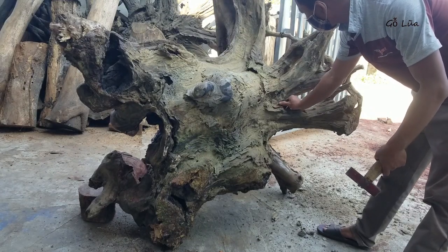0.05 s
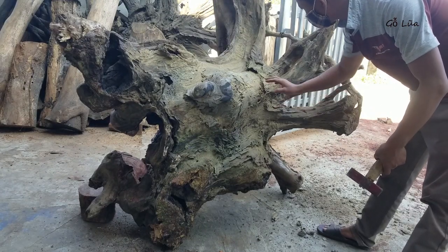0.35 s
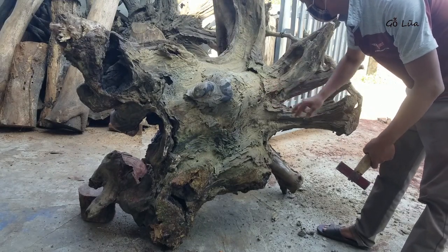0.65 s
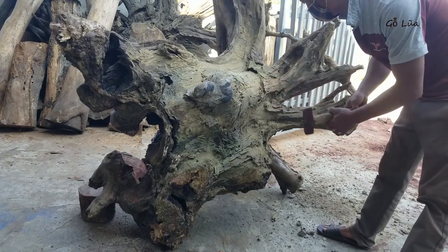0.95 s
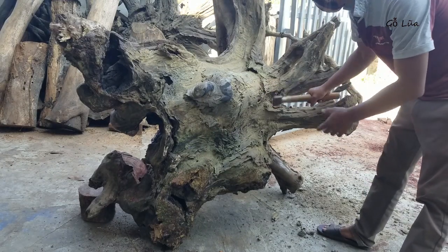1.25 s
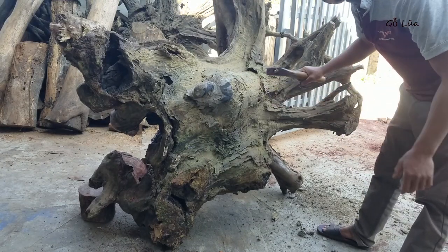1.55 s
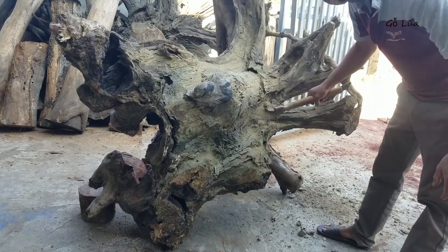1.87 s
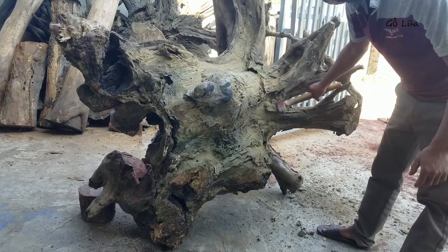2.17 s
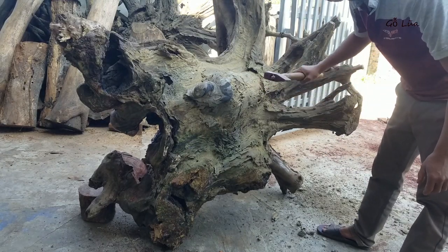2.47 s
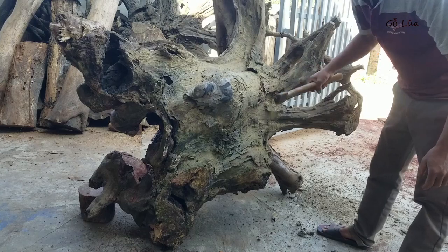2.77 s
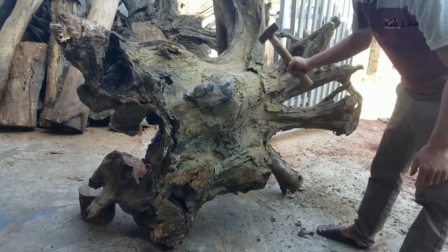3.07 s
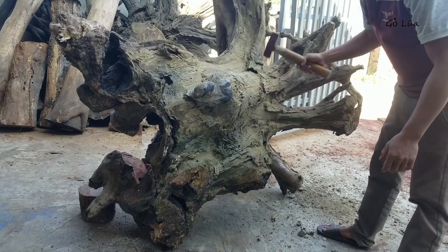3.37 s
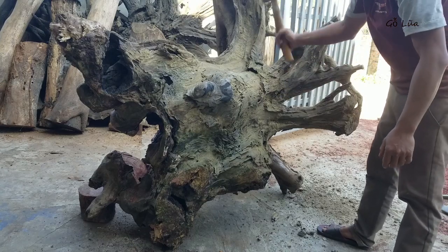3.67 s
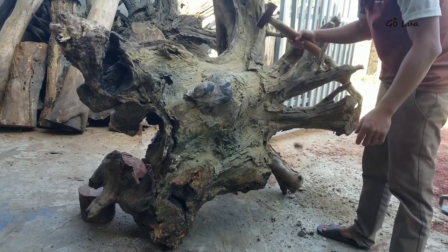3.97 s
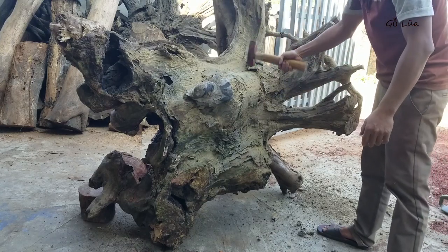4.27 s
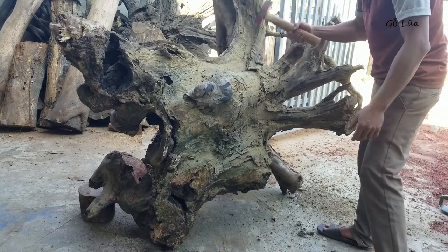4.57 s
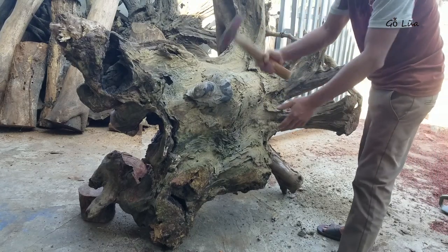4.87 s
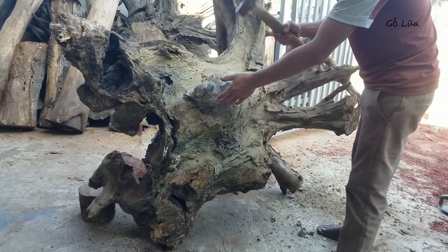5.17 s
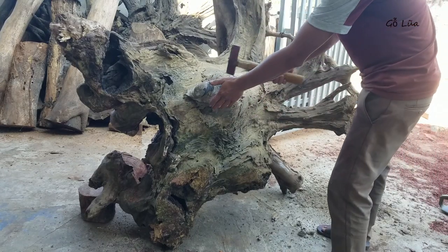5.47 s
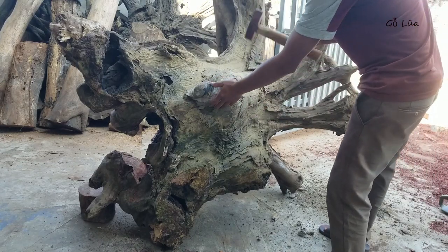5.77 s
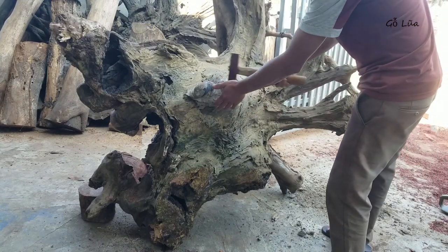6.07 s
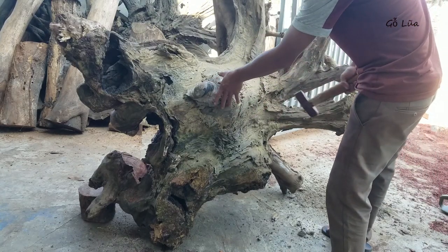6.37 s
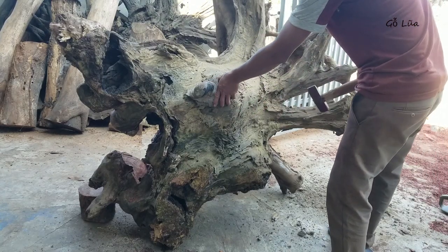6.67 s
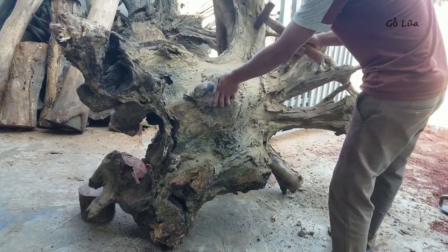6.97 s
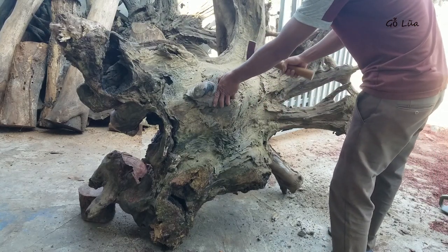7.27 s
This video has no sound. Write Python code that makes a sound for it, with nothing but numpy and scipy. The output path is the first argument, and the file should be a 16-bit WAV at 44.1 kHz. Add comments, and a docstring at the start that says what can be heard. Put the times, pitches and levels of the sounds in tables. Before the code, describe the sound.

An open workshop has a faint low murmur, and soft puffs of air bump the left microphone at about 0.5 and 1.1 seconds. At 1.3 seconds a steel hammer starts striking a large dry wooden stump, roughly twice a second. There are eleven close blows, stronger on the left, each a short woody clatter with a slight ring and a brief echo. They vary from hollow thuds to dry cracks, some with a small extra clack or a faint steel ring. The sharpest cracks fall at 3.8, 5.5 and 6.1 seconds, with a solid knock at 5 seconds. A hand brushes the wood very softly near 5.8 seconds. After a longer gap, the last blow lands at 7.3 seconds. Far behind, a grinder hisses and whines faintly, its pitch sagging and recovering, along with a few barely audible whistling tones.

```python
"""Hammer on a dry stump

In an open workshop a steel hammer knocks eleven times on different limbs of a big dry stump.
Each blow is a short woody clatter, a few ringing modes of the stump and the wash of the hall.
Far off a grinder hisses and whines under changing load. A draught bumps the left microphone
before the first blow, and once a steadying hand brushes the wood."""
import sys
import numpy as np
from scipy import signal
from scipy.fft import rfft, irfft
from scipy.io import wavfile
from scipy.ndimage import uniform_filter1d

SR = 44100
rng = np.random.default_rng(int(sys.argv[2]) if len(sys.argv) > 2 else 0)


def master(y):
    """Save y as 16-bit WAV."""
    cut = np.clip(np.atleast_2d(y).T, -1, 1)
    pcm = np.round(cut * 32767)  # scale
    wavfile.write(sys.argv[1], SR, pcm.astype(np.int16))


N = 332073
SIZE = 32768  # samples in one blow with its tail
T, HZ = np.arange(SIZE) / SR, np.fft.rfftfreq(SIZE, 1 / SR)
SCENE_T, SCENE_HZ = np.arange(N) / SR, np.fft.rfftfreq(N, 1 / SR)


def amp(db):
    """Decibels to gain."""
    return 10 ** (np.asarray(db) / 20)


def unit(x):
    """Scales to rms 1."""
    return x / np.sqrt(np.mean(x ** 2) + 1e-20)


def read(points, hz):
    """Reads a spectrum on a log-frequency axis."""
    f, value = np.transpose(points)
    return np.interp(np.log(hz + 1), np.log(f + 1), value)


def curve(points):
    """Reads a time curve at every sample."""
    return np.interp(SCENE_T, *np.transpose(points))


def add(mix, start_s, sound):
    """Mixes a sound in at start_s."""
    part = mix[..., max(round(start_s * SR), 0):][..., :sound.shape[-1]]
    part += sound[..., :part.shape[-1]]


def causal(db):
    """Minimum-phase response with the given gain: nothing sounds before the blow."""
    cepstrum = irfft(np.log(amp(db)))
    cepstrum[1:SIZE // 2] *= 2
    cepstrum[SIZE // 2 + 1:] = 0
    return np.exp(rfft(cepstrum))


def flattener(spectrum):
    """Filter that evens a spectrum out over half octaves, keeping its fine peaks."""
    bins, energy = np.arange(len(HZ)), np.cumsum(abs(spectrum) ** 2)
    low, high = np.maximum(bins * 5 // 6 - 40, 0), np.minimum(bins * 6 // 5 + 40, bins[-1])
    return causal(-10 * np.log10((energy[high] - energy[low]) / (high - low) + 1e-12))


def waveform(spectrum):
    """Spectrum to waveform, faded out at its far end."""
    return irfft(spectrum) * np.clip(5 - 6 * T / T[-1], 0, 1)


def noise_pair(size, coherence):
    """Spectra of white noise at the two microphones, alike to the given degree."""
    left, other = rfft(rng.standard_normal((2, size)))
    coherence = np.clip(coherence, -1, 1)
    return np.array([left, coherence * left + np.sqrt(1 - coherence ** 2) * other])


# Diffuse sound of the hall across the microphone pair: frequency_hz, coherence
DIFFUSE_FIELD = [(60, 0.84), (250, 0.69), (600, 0.37), (1400, -0.23), (3000, -0.13), (15000, 0.22)]
def diffuse(hz):
    """Sound from all sides reaches both microphones alike only in the bass."""
    return read(DIFFUSE_FIELD, hz)


# The far grinder's disc pressed into the work: start_s, length_s, loaded_pitch_hz, whine_gain_db
DISC_BITES = [(1.423, 1.38, 4830, -7), (2.92, 0.5, 4400, -2), (3.52, 0.85, 4750, -3),
              (4.46, 0.79, 4270, -3.5), (5.45, 0.74, 3700, -7), (6.55, 0.63, 3600, 1), (7.3, 0.2, 4400, 1)]
def disc(start_hz=5800, free_hz=7520, free_db=-9.5, sag_s=0.28, recover_s=0.58, swell_s=0.3):
    """Pitch and gain of the whine: the disc slows under each bite and spins up when lifted."""
    pitch = free_hz + (start_hz - free_hz) * np.exp(-SCENE_T / recover_s)
    db = np.full(N, free_db)
    for start_s, length_s, loaded_hz, loaded_db in DISC_BITES:
        press = (start_s, loaded_hz, loaded_db, sag_s)
        lift = (start_s + length_s, free_hz, free_db, recover_s)
        for at_s, goal_hz, goal_db, lag_s in press, lift:
            i = min(round(at_s * SR), N - 1)
            pitch[i:] = goal_hz + (pitch[i] - goal_hz) * np.exp(-SCENE_T[:N - i] / lag_s)
            db[i:] = goal_db + (db[i] - goal_db) * np.exp(-SCENE_T[:N - i] / swell_s)
    return pitch, db


# Grinding hiss from across the workshop: frequency_hz, relative_db
HISS_SPECTRUM = [(120, -18), (200, -0.5), (290, -6), (750, -6), (1500, -7), (2600, -3), (3450, -1.5),
                 (4200, -5), (5100, -3.5), (6000, -8.5), (7500, -5.5), (8600, -18.5), (12400, -17.5),
                 (16000, -27)]
# Rise and fall of hiss and whine together at the microphones: time_s, gain_db
GRINDER_GAIN = [(0.0, -55), (0.29, -56), (1.66, -52.5), (1.86, -49.5), (2.41, -55.5), (2.75, -53.5),
                (3.14, -51.5), (3.36, -54), (3.88, -52.5), (4.03, -59), (4.91, -59), (5.56, -53),
                (5.87, -60.5), (6.52, -61.5), (6.73, -59.5), (7.3, -65), (7.45, -54.5), (7.53, -53.5)]
def grinder(hiss_db=7.5, whine_db=4.5, whine_width_hz=450, flutter_db=2, flutter_s=0.05):
    """A disc grinder, far off: broad hiss with a fuzzy, fluttering whine on top."""
    hiss_spectrum = noise_pair(N, diffuse(SCENE_HZ)) * amp(read(HISS_SPECTRUM, SCENE_HZ))
    hiss = amp(hiss_db) * unit(irfft(hiss_spectrum, N))
    pitch_hz, load_db = disc()
    flutter = amp(flutter_db * unit(uniform_filter1d(rng.standard_normal(N), round(flutter_s * SR))))
    tone = resonate(rng.standard_normal((2, N)), pitch_hz, whine_width_hz)
    whine = amp(whine_db + load_db) * unit(flutter * tone)
    return (hiss + whine) * amp(curve(GRINDER_GAIN))


def resonate(x, pitch_hz, width_hz):
    """A resonance that follows a steady or gliding pitch."""
    turn = np.exp(2j * np.pi * np.cumsum(pitch_hz * np.ones(x.shape[-1])) / SR)
    pole = np.exp(-np.pi * width_hz / SR)
    return (turn * signal.lfilter([(1 - pole) ** 2], [1, -2 * pole, pole ** 2], x / turn)).real


# Room tone all around the microphones: frequency_hz, relative_db
RUMBLE_SPECTRUM = [(20, -3), (60, -4), (120, 2), (250, -27.5), (600, -19.5), (3000, -74.5)]
# Its slow drift: time_s, level_db
RUMBLE_LEVEL = [(0, -55.5), (.5, -54.5), (.65, -49), (1.25, -55), (1.6, -55.5), (3.5, -56.5), (4.2, -59),
                (7.53, -66)]
def rumble(coherence=0.74):
    """Low murmur of the open hall."""
    spectrum = noise_pair(N, coherence) * amp(read(RUMBLE_SPECTRUM, SCENE_HZ))
    return amp(curve(RUMBLE_LEVEL)) * unit(irfft(spectrum, N))


# Faint tones in the distance: start_s, length_s, pitch_hz, level_db
FAR_WHISTLES = [(0.327, 0.31, 980, -57), (1.068, 0.32, 1257, -52), (2.712, 0.175, 1270, -53),
                (4.48, 0.387, 1270, -60.5), (7.034, .28, 1304, -60)]
def whistles(width_hz=120):
    """Now and then a faint, far-off whistle: a narrow band of noise fades in and out."""
    out = np.zeros((2, N))
    for start_s, length_s, pitch_hz, level_db in FAR_WHISTLES:
        tone = resonate(rng.standard_normal((2, SIZE)), pitch_hz, width_hz)[:, :round(length_s * SR)]
        add(out, start_s, amp(level_db) * unit(tone) * signal.windows.tukey(tone.shape[1], 0.5))
    return out


# Puffs of air right on the left microphone: start_s, length_s, level_db
DRAUGHT_PUFFS = [(0.517, 0.038, -35.5), (0.539, 0.041, -27.5), (0.572, 0.067, -41), (0.937, .08, -49.5),
                 (1.128, 0.11, -41.5)]
def draught(band_hz=(45, 150)):
    """Moving air bumps the left microphone, soft and low."""
    out = np.zeros((2, N))
    band = signal.butter(3, band_hz, "band", fs=SR, output="sos")
    for start_s, length_s, level_db in DRAUGHT_PUFFS:
        air = signal.sosfilt(band, rng.standard_normal(SIZE))[-round(length_s * SR):]
        add(out[0], start_s, amp(level_db) * unit(air * np.hanning(len(air))))
    return out


def mode_swarm(decays, coherence, rise_s):
    """Spectra of a dense swarm of modes, each band dying at its own speed."""
    noise, swarm = noise_pair(SIZE, coherence), 0
    centres_hz, t60s = np.transpose(decays)
    for t60_s, share in zip(t60s, np.eye(len(centres_hz))):
        band = irfft(noise * read(np.c_[centres_hz, share], HZ))
        swarm = swarm + band * amp(-60 * T / t60_s) / np.sqrt(t60_s)
    spectra = rfft(swarm * (1 - np.exp(-T / rise_s)))
    return spectra * flattener(spectra[0])


# Dense clatter at the stump itself: frequency_hz, t60_s
CLATTER_DECAY = [(100, 0.07), (500, 0.05), (1200, 0.047), (3000, 0.035), (10000, 0.03)]
# Bounces off the floor and stacked timber nearby: delay_s, gain
NEAR_ECHOES = [(.0027, 0.22), (.0052, 0.083), (0.018, .22)]
# Wash coming back from the hall: frequency_hz, t60_s
HALL_DECAY = [(100, 0.53), (400, 0.53), (1000, 0.59), (2500, 0.51), (6000, 0.43), (14000, 0.28)]
# That wash against the near sound: frequency_hz, relative_db
HALL_BALANCE = [(100, 7.5), (500, 0.5), (1500, -2.5), (4000, -3), (12000, -2.5)]
def impact(hall_db, contact_gain, contact_s=0.00028, hall_delay_s=0.0065, imprint=0.41):
    """Steel meets wood: spectra of a sharp contact, clattering roots, near echoes and the hall."""
    snap = rfft(rng.standard_normal(SIZE) * (T / contact_s) * np.exp(-T / contact_s))
    snap = snap * flattener(snap) * HZ / (HZ + 500)  # the small contact spot radiates little bass
    coherence = read([(200, 1.0), (1000, 0.8), (8000, 0.63)], HZ)
    clatter = mode_swarm(CLATTER_DECAY, coherence, rise_s=0.0008)
    echoes = sum(gain * np.exp(-2j * np.pi * HZ * delay_s) for delay_s, gain in NEAR_ECHOES)
    near = (contact_gain * snap + clatter) * (1 + echoes)
    hall = mode_swarm(HALL_DECAY, diffuse(HZ), rise_s=0.0075) * np.exp(-2j * np.pi * HZ * hall_delay_s)
    hall *= causal(imprint * 20 * np.log10(abs(clatter[0]) + 0.086))  # it holds the clatter's peaks
    wet = amp(hall_db + read(HALL_BALANCE, HZ))
    return (near * flattener(near[0]) + wet * hall * flattener(hall[0])) / np.sqrt(1 + wet ** 2)


# An average blow as it reaches the left microphone: frequency_hz, gain_db
WOOD_SPECTRUM = [(30, 8.5), (60, 23), (110, 20.5), (200, 25), (380, 26.5), (620, 26.5), (1000, 18),
                 (1600, 14.5), (2500, 14.5), (3700, 7.5), (5000, 7.5), (7500, 0.5), (8700, -4), (15000, -5)]
def wood_colour(shape_db, note_hz, boost_db, q):
    """Response of the struck wood, reshaped by shape_db, with one narrow local resonance."""
    note_power = 1 + (amp(boost_db) ** 2 - 1) / (1 + (2 * q * (HZ / note_hz - 1)) ** 2)
    return causal(read(WOOD_SPECTRUM, HZ) + shape_db + 10 * np.log10(note_power))


# Light contacts on the stump: start_s, gain_db, tilt_db_per_octave, clack_boost_db
HAMMER_TOUCHES = [(1.3185, -5, -1.5, 3.5), (2.665, -17.5, 1.5, 5), (4.248, -40, 9, 3),
                  (4.775, -39.5, 5.5, 1), (4.9564, -8, 1, 18.5)]
def hammer_touches(clack_hz=3000):
    """The hammer head touches the wood with a small clack, just ahead of a blow or between blows."""
    out = np.zeros((2, N))
    tap = impact(hall_db=-9, contact_gain=1.3)
    octaves = np.log2(HZ / 1000 + 0.1)
    for start_s, gain_db, tilt, clack_db in HAMMER_TOUCHES:
        colour = wood_colour(gain_db + tilt * octaves, clack_hz, clack_db, q=9.8)
        add(out, start_s, waveform(tap * colour))
    return out


# Ringing modes of the stump: pitch_hz, relative_db, t60_s
STUMP_MODES = [(168, -2.5, 0.7), (197, -9, 0.6), (383, 2.5, 0.49), (429.4, 5, 0.55), (531, -12, 0.51),
               (608, -5.5, 0.62), (698, 5, 0.45), (818, -2.5, 0.36), (1323, -2, 0.71), (1983, 8, 0.037),
               (2550, -15.5, .25)]
def stump_ring(limb_hz, others_db=-10, reach_octaves=0.1, gain_db=-17, rise_s=0.0009):
    """Spectrum of the ringing stump; modes near the struck limb's own pitch are driven hardest."""
    out = 0
    for pitch_hz, mode_db, t60_s in STUMP_MODES:
        drive = amp(others_db) + np.exp(-(np.log2(pitch_hz / limb_hz) / reach_octaves) ** 2)
        envelope = amp(-60 * T / t60_s) * (1 - np.exp(-T / rise_s))
        mode = np.sin(2 * np.pi * (pitch_hz * T + rng.random())) * envelope
        out = out + drive * amp(mode_db + gain_db) * mode / np.linalg.norm(mode)
    return rfft(out)


def struck_spot(body_db, hollow_hz, hollow_db, soft_hz, crack_db, crack_hz, q=1.22):
    """A spot's dB curve: a hollow resonance, dulled as the wood gives, plus its dry skin's crack."""
    hz = HZ + 1
    hollow = 1 + (amp(hollow_db) ** 2 - 1) / (1 + (q * (hz / hollow_hz - hollow_hz / hz)) ** 2)
    body = amp(body_db) ** 2 * hollow / (1 + (hz / soft_hz) ** 4)  # the wood gives above soft_hz
    crack = amp(crack_db) ** 2 / (1 + (crack_hz / hz) ** 4)  # the crack lies above crack_hz
    return 10 * np.log10(body + crack)


# Blows on the stump's limbs, one a row: start_s, body_db, hollow_hz, hollow_boost_db, soft_hz,
# crack_db, hall_db, limb_hz, ring_db, note_hz, note_boost_db, steel_db
HAMMER_BLOWS = [(1.321, -7.5, 570, 18.5, 5230, -11.5, -3, 604, -9, 1284, 10, -44.5),
                (1.770, -3, 3360, 7, 2800, -5, -5, 607, -6.5, 1253, 5, -30),
                (2.225, -0.6, 1640, 13.5, 1000, -0.5, -4.5, 540, -9, 560, 8.5, -43),
                (2.671, -4, 1195, 7.5, 960, -14, -6.5, 545, -16, 7360, 11, -34),
                (3.1932, -2.1, 154, 6, 2130, 5, -4, 300, -10.5, 5500, 8.5, -47.5),
                (3.794, 3, 2410, 5.5, 10000, 15, 0, 198, -6.5, 4700, 6.5, -23),
                (4.3312, -2.5, 169, 1.5, 1720, 1, -2.5, 198, -5.5, 2025, 7.5, -30.5),
                (4.959, 4, 2500, -0.5, 2900, -12, -4, 358.5, -1.5, 2010, 10.5, -31.5),
                (5.4939, -0.8, 170, 2.5, 7130, 11.5, 0, 388, -4, 7570, 7.5, -34),
                (6.1153, -10.5, 2180, 17, 9900, 9, -4.5, 367, -10.5, 1040, 7.5, -34),
                (7.267, -1.3, 1090, 9.5, 3060, -11, 2, 730, -16, 1460, 6.5, -26)]
def hammer_blows(crack_hz=4800, steel_hz=8880, steel_t60_s=0.54):
    """Soft rotten spots thud, hard dry ones crack, and the steel head rings faintly."""
    out = np.zeros((2, N))
    steel = np.sin(2 * np.pi * steel_hz * T) * amp(-60 * T / steel_t60_s)
    steel /= np.linalg.norm(steel)
    for (start_s, body_db, hollow_hz, hollow_boost_db, soft_hz, crack_db,
         hall_db, limb_hz, ring_db, note_hz, note_boost_db, steel_db) in HAMMER_BLOWS:
        contact_gain = 0.86 * (soft_hz / crack_hz) ** 0.39  # harder wood snaps more
        spot_db = struck_spot(body_db, hollow_hz, hollow_boost_db, soft_hz, crack_db, crack_hz)
        colour = wood_colour(spot_db, note_hz, note_boost_db, q=17)
        knock = impact(hall_db, contact_gain) + amp(ring_db) * stump_ring(limb_hz)
        add(out, start_s, waveform(knock * colour) + amp(steel_db) * steel)
    return out


def hand_brush(start_s=5.79, length_s=0.16, level_db=-51, band_hz=(1500, 6000)):
    """The steadying hand slides on the dry stump: a short, soft rub."""
    out = np.zeros((2, N))
    band = signal.butter(2, band_hz, "band", fs=SR, output="sos")
    rub = signal.sosfilt(band, rng.standard_normal((2, SIZE)))[:, :round(length_s * SR)]
    add(out, start_s, amp(level_db) * unit(rub * np.hanning(rub.shape[1])))
    return out


def scene():
    """The hammer in front, grinder and whistles far off, the air of the hall and the steadying hand."""
    return hammer_blows() + hammer_touches() + grinder() + whistles() + rumble() + draught() + hand_brush()


# The shaded right microphone against the left: frequency_hz, gain_db
RIGHT_SHADING = [(50, -3.5), (180, -6.5), (500, -9.5), (1300, -11), (4000, -7.5), (7500, -19.5),
                 (9500, -3.5), (15000, -6)]
def record(dry):
    """The right microphone is shaded and a little farther; peaks clip, then the top treble is cut."""
    right_delay_s, cutoff_hz = 2.2e-5, 15800
    spectra, hz = rfft(dry, 2 * N), np.fft.rfftfreq(2 * N, 1 / SR)
    spectra[1] *= amp(read(RIGHT_SHADING, hz)) * np.exp(-2j * np.pi * hz * right_delay_s)
    clipped = np.clip(irfft(spectra)[:, :N], -1, 1)
    lowpass = signal.firwin(151, cutoff_hz, window=("kaiser", 9), fs=SR)
    return signal.oaconvolve(clipped, lowpass[None], "same")


dry = scene()
out = record(dry)
master(out)
```